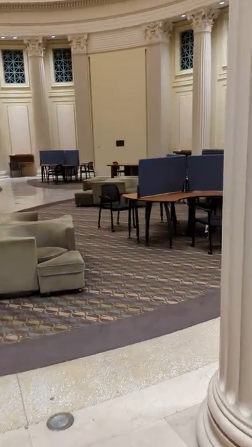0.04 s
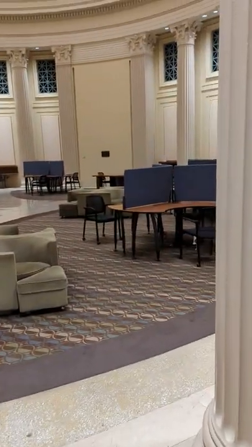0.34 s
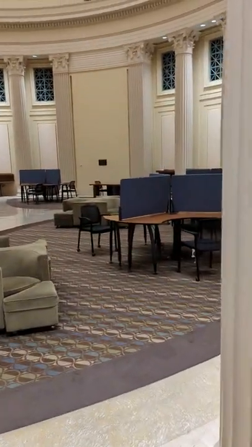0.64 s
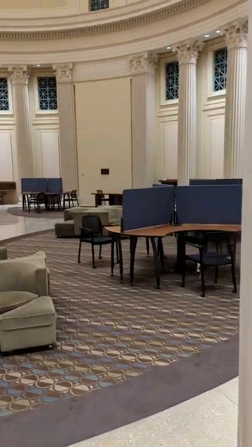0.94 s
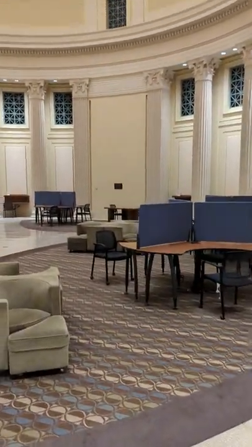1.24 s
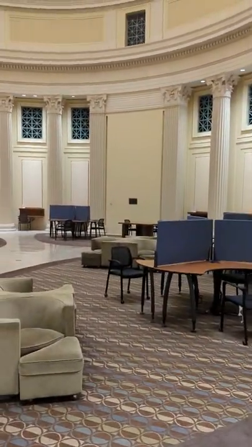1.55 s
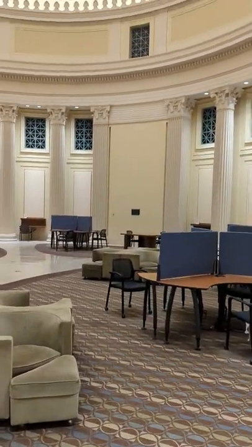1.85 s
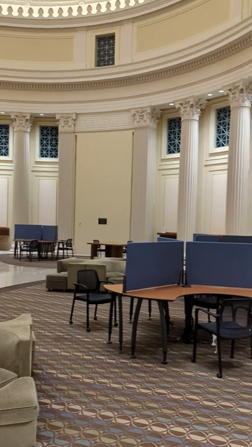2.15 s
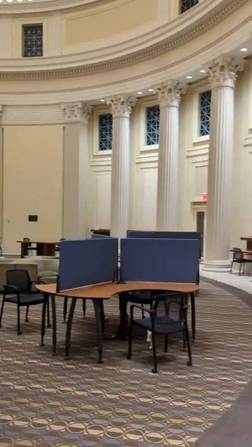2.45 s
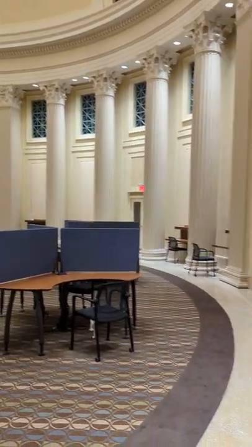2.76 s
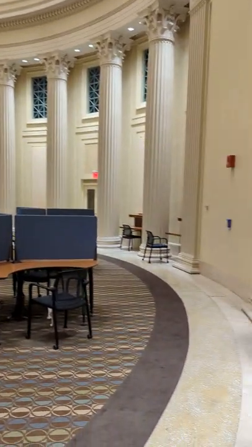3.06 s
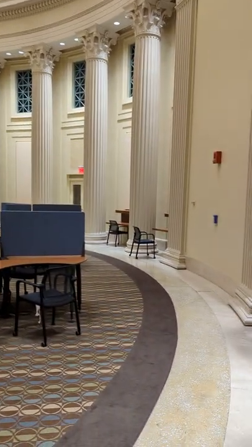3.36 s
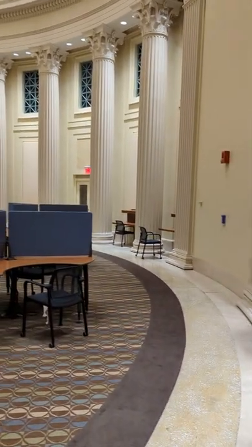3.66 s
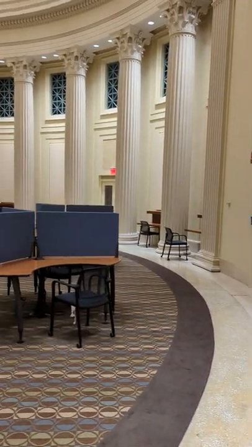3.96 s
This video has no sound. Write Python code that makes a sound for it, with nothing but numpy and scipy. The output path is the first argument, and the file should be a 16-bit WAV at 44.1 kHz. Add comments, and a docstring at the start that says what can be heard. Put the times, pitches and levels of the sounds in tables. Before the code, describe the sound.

A heavy door slams shut in a large domed stone hall. First, soft ventilation hums while clothing rustles close to the microphone with small ticks; then the latch clacks and the door booms, rattles and echoes.

```python
"""Heavy door in a domed stone hall

Ventilation hums softly while someone close by moves with a rustle of clothing and small ticks.
The metal latch clacks, then the heavy leaf slams, booms and rattles in its frame.
The stone walls ring on, and the dome sends back late, low echoes."""
import sys
import numpy as np
from scipy import signal
from scipy.fft import rfft, irfft
from scipy.io import wavfile
from scipy.ndimage import map_coordinates

SR = 44100
rng = np.random.default_rng(int(sys.argv[2]) if len(sys.argv) > 2 else 0)


def unload_wav(signal):
    """Save mono or channel-first audio to the path in sys.argv[1] as 16-bit WAV at rate SR, clipped to [-1, 1]."""
    wavfile.write(
        sys.argv[1],
        SR,
        np.round(np.clip(np.atleast_2d(signal).T, -1, 1) * 32767).astype(np.int16),
    )


N = 176400


def undb(db):
    """Decibels to gain."""
    return 10 ** (np.asarray(db) / 20)


def along(points, hz):
    """Read (frequency [Hz], value) points on a log-frequency axis."""
    freqs, values = np.array(points, float).T
    return np.interp(np.log(np.maximum(hz, 1)), np.log(freqs), values)


def fader(points):
    """Gain ride through (time [s], level [dB]) points."""
    return undb(np.interp(np.arange(N) / SR, *np.array(points, float).T))


def pan(db):
    """Left and right gains for a left-minus-right level difference."""
    return undb(np.array([[db], [-db]]) / 2)


def add(out, start, sound):
    """Mix a sound in from a start time in seconds."""
    i = int(np.clip(start * SR, 0, N - 1))
    count = min(sound.shape[-1], N - i)
    out[:, i:i + count] += sound[..., :count]


def attack(t, rise_s):
    """Onset that eases up to full level."""
    return 1 - np.exp(-t / rise_s)


def fade(t, t60):
    """Exponential decay, 60 dB in t60 seconds."""
    return np.exp(-np.log(1000) * t / np.maximum(t60, 1e-3))


def flutter(rate_hz):
    """Smooth random wandering with a spread near 1."""
    steps = rng.standard_normal(2048)
    return np.interp(np.arange(N) / SR * rate_hz, np.arange(len(steps)), steps)


def noise(colour, size, tilt_db=0):
    """Coloured stereo noise at unit level, centred in the bass, tilted per octave above 500 Hz."""
    # likeness of left and right: (frequency [Hz], correlation [0-1])
    likeness = [(40, 0.98), (125, 0.97), (250, 0.91), (500, 0.57), (1000, 0), (2000, 0.07), (15000, 0.03)]
    hz = np.fft.rfftfreq(size, 1 / SR)
    mid, side = np.exp(2j * np.pi * rng.random((2, len(hz))))
    alike = along(likeness, hz)
    stereo = mid * np.sqrt(1 + alike) + side * np.sqrt(1 - alike) * np.array([[1], [-1]])
    octaves = np.log2(np.maximum(hz, 500) / 500)
    x = irfft(stereo * undb(along(colour, hz) + tilt_db * octaves), size)
    return x / x.std()


def die_away(x, t60s):
    """Let each three-quarter-octave band decay at its own rate."""
    size = x.shape[-1]
    t, hz, spectrum = np.arange(size) / SR, np.fft.rfftfreq(size, 1 / SR), rfft(x)
    centres = 50 * 2 ** np.arange(0, 8.5, .75)
    out = np.zeros_like(x)
    for centre in centres:
        band = along(list(zip(centres, centres == centre)), hz)
        out += irfft(spectrum * band, size) * fade(t, along(t60s, centre))
    return out


def ventilation():
    """A bed of softly wavering air noise over a low rumble."""
    # colours of air and rumble: (frequency [Hz], relative level [dB])
    air_colour = [(20, -46), (50, -18), (110, -2), (175, -9), (250, -5.5), (360, 0), (450, -3), (620, -6),
                  (850, -10.5), (1200, -11), (2400, -17), (3600, -27.5), (7000, -44), (15500, -70)]
    rumble_colour = [(20, -48), (48, 3), (85, -2), (120, 4.5), (200, -0.5), (400, -36)]
    # their swells: (time [s], relative level [dB])
    air_ride = [(0, -56), (1.0, -55), (1.88, -57), (2.08, -53.5), (2.35, -50.5), (2.8, -51.5),
                (3.25, -50.5)]
    rumble_ride = [(0.0, -67), (0.05, -69), (1.88, -66.5), (2.5, -54.5), (3.14, -57), (3.2, -54)]
    air = noise(air_colour, N) * fader(air_ride) * undb(1.95 + .5 * flutter(rate_hz=6.74))
    rumble = noise(rumble_colour, N) * fader(rumble_ride) * undb(1)
    return air + rumble


def clothing():
    """Fabric rubs in uneven, grainy strokes; its colour wavers with the sliding speed."""
    # strokes: (start [s], length [s], level [dB], pan [dB], tilt [dB/octave], hiss centre [Hz])
    rubs = [(-.1, 0.74, -54.5, -3.5, 2.5, 6600), (0.303, 0.24, -55, -8.5, -2, 6200),
            (0.54, 0.35, -59, -9, -2, 6200), (0.79, 0.71, -65, -2.5, -0.5, 6160),
            (1.435, 0.45, -66, -2, -2, 6800), (1.815, 0.39, -58, -4, 2.5, 7950),
            (2.143, 0.29, -58.5, -3.5, 2.5, 9100), (2.39, 0.52, -67.5, -5.5, 0, 8700)]
    # colour of the fabric: (frequency [Hz], relative level [dB])
    cloth = [(300, -21), (900, -7.5), (2200, 0.5), (3300, -6), (5200, -8), (7400, -8), (8100, -14),
             (9200, -5.5), (10800, -16), (12000, -12), (15500, -22)]
    fade_s, hiss_db, hiss_octaves = 0.096, 4, 0.24
    out, t = np.zeros((2, N)), np.arange(N) / SR
    hz = np.geomspace(200, 16000, 100)
    slide = np.cumsum(1 + .035 * flutter(rate_hz=9))
    for start, length, db, pan_db, tilt_db, hiss_hz in rubs:
        hiss_peak = hiss_db * np.exp(-(np.log2(hz / hiss_hz) / hiss_octaves) ** 2)
        colour = list(zip(hz, along(cloth, hz) + hiss_peak))
        grain_db = 1.4 * flutter(rate_hz=36.55) + 2.6 * flutter(rate_hz=400)
        stroke = np.clip(np.minimum(t - start, start + length - t) / fade_s, 0, 1) * undb(db + grain_db)
        on = stroke > 0
        texture = noise(colour, SR, tilt_db)
        hiss = np.array([map_coordinates(side, [slide[on] % SR], mode="wrap") for side in texture])
        out[:, on] += hiss * stroke[on] * pan(pan_db)
    return out


def ticks():
    """Small ticks and scuffs of someone moving: noise bursts with a faint room tail."""
    # contacts: (time [s], level [dB], pan [dB], t60 [s], centre [Hz])
    contacts = [(0.2443, -45.5, -1, 0.13, 2500), (0.275, -46.5, -11, 0.055, 2750),
                (0.4126, -46, -13, 0.07, 4160), (0.5062, -44.5, -12, 0.1, 4100),
                (.6429, -56, -19, 0.25, 4500), (0.684, -57, -16, 0.13, 4500), (0.757, -54, -10, 0.24, 4800),
                (0.9965, -55, -18.5, 0.028, 6030), (1.385, -61.5, -9, 0.29, 3900),
                (1.497, -45, 1, 0.042, 7900), (2.027, -52.5, -4, 0.26, 2110), (2.242, -50, -5, 0.046, 4500),
                (2.791, -44.5, 4, 0.024, 2270), (2.912, -51, -12, 0.022, 1400),
                (3.1018, -40, -1.5, 0.043, 6100), (3.176, -55.5, -8, .022, 5000),
                (3.7143, -39.5, 2, 0.028, 13000), (3.8865, -52.5, -1, 0.061, 9500)]
    # colour of a tick: (frequency [multiple of centre], relative level [dB])
    tick_colour = [(.06, -8), (.4, 2), (1, 2), (1.5, 2), (3, -14), (6, -24)]
    out, t = np.zeros((2, N)), np.arange(SR // 2) / SR
    room_tail = undb(-15) * fade(t, t60=0.13)
    for start, db, pan_db, t60, centre_hz in contacts:
        colour = [(multiple * centre_hz, level) for multiple, level in tick_colour]
        envelope = np.hypot(fade(t, t60), room_tail) * attack(t, rise_s=0.00081)
        add(out, start, noise(colour, len(t)) * envelope * pan(pan_db) * undb(db))
    return out


def hall(x):
    """Stone walls build a long, dark reverb; the dome returns late, low echoes."""
    # reverb decay: (frequency [Hz], t60 [s])
    decay = [(60, 0.5), (150, 2), (500, 4), (2500, 2), (5000, 0.95), (9000, 1.4), (15000, 4.5)]
    # reverb tone: (frequency [Hz], gain [dB])
    tone = [(35, -2), (60, -5.5), (110, -3.5), (220, -2), (500, -8.5), (1200, -7.5), (2600, -6.5),
            (5000, -9.5), (7000, -18), (9000, -26), (15000, -34)]
    # dome reflections: (delay [s], level at the dome's resonance [dB])
    dome_echoes = [(.415, -7.5), (0.491, -15), (.565, -7.5)]
    predelay_s, dome_hz, dome_q = 0.011, 103.6, 5
    t, hz = np.arange(N) / SR, np.fft.rfftfreq(2 * N, 1 / SR)
    tail = die_away(noise([(20, 0), (20000, 0)], N), decay)
    tail *= attack(np.maximum(t - predelay_s, 0), rise_s=.027)
    tail_energy = SR * along(decay, hz) / (2 * np.log(1000))
    reverb = rfft(tail, 2 * N) * undb(along(tone, hz)) / np.sqrt(tail_energy)
    echoes = sum(undb(db) * np.exp(-2j * np.pi * hz * delay) for delay, db in dome_echoes)
    dome_band = 1 / (1 + 1j * dome_q * (hz / dome_hz - dome_hz / np.maximum(hz, 1)))
    return irfft(rfft(x, 2 * N) * (reverb + echoes * dome_band))[:, :N]


def metal(modes, t, t60, tilt_db=0):
    """Hardware rings in clusters of close, beating modes, voiced as peaks of decaying noise."""
    hz = np.geomspace(100, 16000, 3000)
    gain = sum(undb(db) / (1 + 2 * ((hz - centre) / width) ** 2) for centre, db, width in modes)
    colour = np.column_stack([hz, 20 * np.log10(gain)])
    return noise(colour, len(t), tilt_db) * fade(t, t60)


def wood(modes, t, tilt_db=0, spread=0):
    """Damped wooden modes, randomly detuned by spread; a sharper blow tilts them toward the highs."""
    detunes = 1 + spread * rng.uniform(-1.13, 1, len(modes))
    out = np.zeros_like(t)
    for (hz, db, t60), detune in zip(modes, detunes):
        octaves = np.log2(hz / modes[0][0])
        out += undb(db + tilt_db * octaves) * fade(t, t60) * np.sin(2 * np.pi * hz * detune * t)
    return out


def frame_knock(t):
    """Wood knocks where leaf meets frame; the pitch shifts a little with the point of contact."""
    # modes of the knock: (frequency [Hz], relative level [dB], t60 [s])
    knock_modes = [(147.9, -12, 0.39), (355, -15, 0.099), (385, -1, .12), (490.7, -0.5, 0.087),
                   (649, -4, 0.059), (695, 1, 0.043), (762.8, -7, 0.061)]
    return wood(knock_modes, t, spread=0.021)


def latch():
    """The bolt hits the strike plate in a quick cluster of clacks, first woody, then metallic."""
    # bolt strikes: (time [s], clack [dB], ring [dB], knock [dB], pan [dB])
    strikes = [(3.268, -19, -30, -21.5, 0.5), (3.276, -23.5, -35.5, -16, -3.5),
               (3.2875, -19.5, -17.5, -27.5, 1), (3.332, -29, -46, -51, -2)]
    # mode clusters of the latch metal: (frequency [Hz], relative level [dB], width [Hz])
    latch_modes = [(720, 0.5, 76), (1440, -0.5, 340), (3330, -3.5, 73), (7230, 5, 42), (10500, -4, 150),
                   (11200, -10.5, 200)]
    # clack colour: (frequency [Hz], relative level [dB])
    clack_colour = [(24, -43), (40, -18), (183, -7), (253, -6), (377, -8), (577, -14), (704, -10.5),
                    (998, -11), (1490, -10), (2450, -12), (10400, -21.5), (15500, -28)]
    # clack decay: (frequency [Hz], t60 [s])
    clack_decay = [(100, 0.57), (600, 0.26), (3000, 0.12), (14000, 0.27)]
    out, t = np.zeros((2, N)), np.arange(SR // 2) / SR
    for start, clack_db, ring_db, knock_db, pan_db in strikes:
        clack = undb(clack_db) * die_away(noise(clack_colour, len(t)), clack_decay)
        ring = undb(ring_db) * metal(latch_modes, t, t60=0.11)
        knock = undb(knock_db) * frame_knock(t)
        add(out, start, pan(pan_db) * (clack + ring + knock) * attack(t, rise_s=0.00082))
    return out


def door():
    """The leaf slams and rebounds: the panel booms, the wood knocks, the fittings rattle and ring."""
    # blows on the frame, at relative levels: (time [s], rattle [dB], rattle tilt [dB/octave],
    # boom [dB], boom tilt [dB/octave], knock [dB], ring [dB], ring tilt [dB/octave])
    blows = [(3.3714, -17.5, 1, -35.5, 11.5, -20, -37, -14), (3.3846, -11, -0.63, -11.5, 1, -49, -15.5, 15),
             (3.4201, -21.5, 2, -19, -1.5, -24.5, -26.5, -23),
             (3.4329, -19.5, -0.5, -24, 2.5, -23.5, -24.5, -7),
             (3.4552, -24.5, 0, -38, 3.5, -30.3, -28, -11),
             (3.4734, -15, -1.02, -23.5, -3, -22, -18.5, -4.5),
             (3.5288, -34.5, 0.5, -28, 6.5, -24.5, -30, -5), (3.5625, -23.5, -2, -24.5, 4, -28, -23.5, -7)]
    # panel modes: (frequency [Hz], relative level [dB], t60 [s])
    leaf_modes = [(57.47, -4, 1.1), (66.4, -15, 1.2), (93.8, -7, 0.38), (114.1, 0.5, 0.38),
                  (149.4, -13.5, 0.42), (213.3, -9.5, 0.42), (283, -9.5, 0.19)]
    # mode clusters of the fittings: (frequency [Hz], relative level [dB], width [Hz])
    fitting_modes = [(1417, -9, 32), (1570, -12, 35), (1746, -9, 32), (1855, -1, 20), (2180, -3, 79),
                     (2350, -10, 68), (2566, -5, 71), (2740, -.5, 54), (2927, 1.5, 90)]
    # rattle colour: (frequency [Hz], relative level [dB])
    rattle_colour = [(30, -20), (65, 12), (150, 7), (400, -1), (700, 2), (1050, -.5), (1350, 1),
                     (1800, 1.5), (2400, 0), (2950, -6), (3300, -6.5), (5000, -13.5), (10000, -16.5),
                     (15500, -19.5)]
    # rattle decay: (frequency [Hz], t60 [s])
    rattle_decay = [(100, 0.71), (600, 0.2), (2500, 0.21), (6000, 0.29), (14000, 0.13)]
    out, t = np.zeros((2, N)), np.arange(SR) / SR
    for start, rattle_db, rattle_tilt, boom_db, boom_tilt, knock_db, ring_db, ring_tilt in blows:
        rattle = undb(rattle_db + 0.5) * die_away(noise(rattle_colour, SR, rattle_tilt), rattle_decay)
        ring = undb(ring_db) * metal(fitting_modes, t, t60=.14, tilt_db=ring_tilt)
        boom = undb(boom_db) * wood(leaf_modes, t, boom_tilt) * attack(t, rise_s=0.0026)
        knock = undb(knock_db) * frame_knock(t)
        clatter = (rattle + ring + knock) * attack(t, rise_s=0.0015)
        add(out, start, pan(db=0.65) * (clatter + boom))
    return out


def scene():
    """The slam and its reverb over the quiet air and close rustle."""
    slam = latch() + door()
    return slam + hall(slam) + ventilation() + clothing() + ticks()


def record(dry):
    """Clip the peaks at full scale, then cut the very top."""
    top_hz = 15700
    lowpass = signal.ellip(10, .1, 80, top_hz, fs=SR, output="sos")
    return signal.sosfilt(lowpass, np.clip(dry, -1, 1))


dry = scene()
out = record(dry)
unload_wav(out)
```